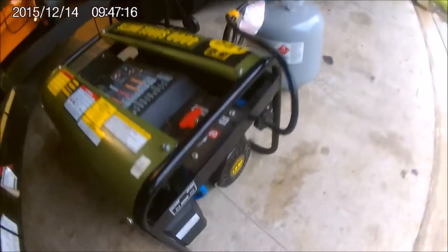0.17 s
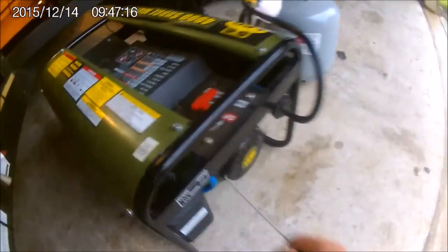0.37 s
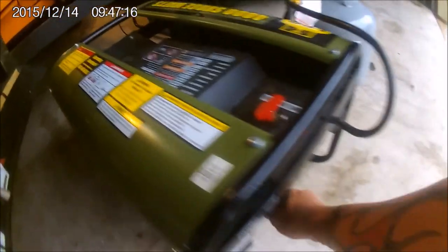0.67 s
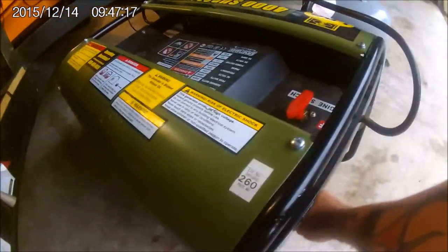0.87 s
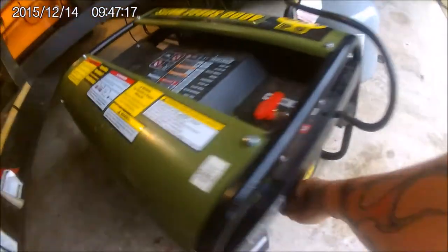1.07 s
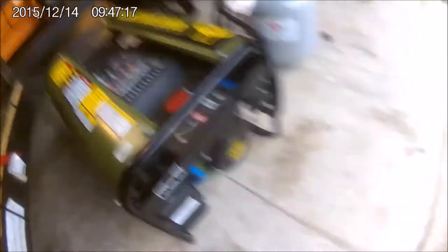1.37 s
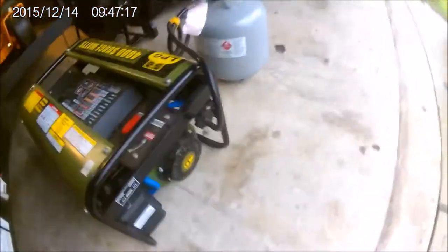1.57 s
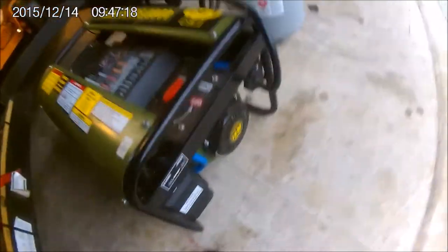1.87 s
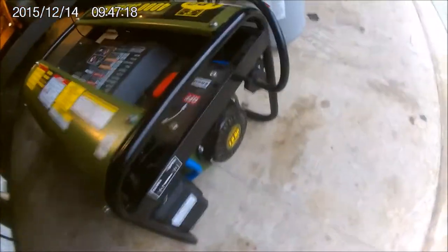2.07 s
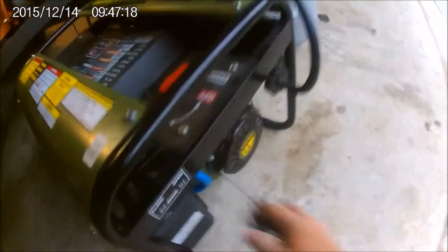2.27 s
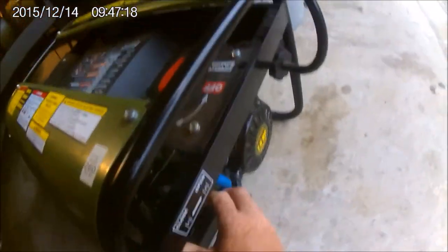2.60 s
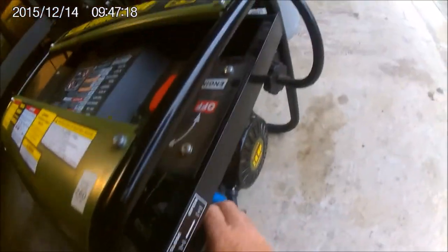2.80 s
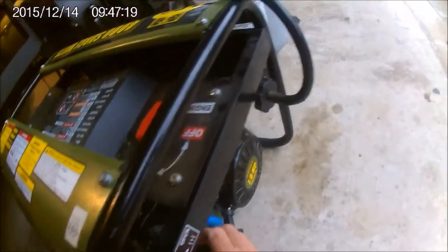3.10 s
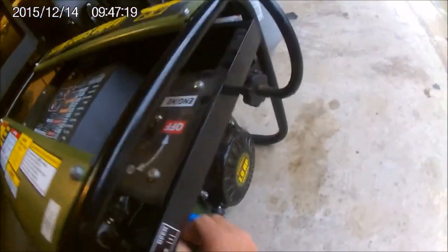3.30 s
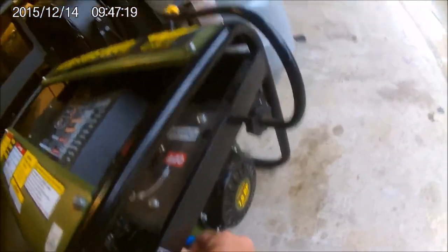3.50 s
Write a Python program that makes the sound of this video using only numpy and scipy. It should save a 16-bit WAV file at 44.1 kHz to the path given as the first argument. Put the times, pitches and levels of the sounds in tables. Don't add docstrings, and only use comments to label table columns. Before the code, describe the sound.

Small one-cylinder generator on outdoor concrete: the rope ticks back quietly, a pull makes pawls clack and metal clatter, then it catches, speeds up and drones loudly, heard through a muffled, ringing camera case.

```python
import sys
import numpy as np
from scipy import signal
from scipy.fft import rfft, irfft
from scipy.io import wavfile
from scipy.ndimage import uniform_filter1d, minimum_filter1d

SR = 44100
rng = np.random.default_rng(int(sys.argv[2]) if len(sys.argv) > 2 else 0)


def int16_out(signal):
    q = np.round(np.clip(np.atleast_2d(signal).T, -1, 1) * 32767)
    wavfile.write(sys.argv[1], SR, q.astype(np.int16))


def gain_from_db(level_db):
    decades = np.asarray(level_db, float) / 20
    return 10 ** decades


N = 160965
T = np.arange(N) / SR

# t/s, clatter level/dB, exhaust level/dB, once-a-cycle throb depth (0-1)
CRANKING = [
    (1.042, -31, -87, 0.3),
    (1.121, -35.5, -54.5, 0),
    (1.22, -26, -63.5, 0.6),
    (1.361, -26.5, -45, 0),
    (1.531, -26.5, -60.5, 0.3),
    (1.699, -24, -37, 0.1),
    (1.851, -20.5, -32.5, 0.3),
]
RUNNING = [(1.93, -22.5, -27.5, 0.16), (1.996, -15, -32.5, 0.19), (2.058, -14.5, -24, 0.12),
           (2.178, -12.5, -28, 0.58), (2.264, -13, -22, 0.097), (2.5, -11, -23, 0.12),
           (2.66, -11, -25.5, 0.037), (2.94, -12, -28, 0.023), (3.1, -12.5, -28.5, 0.052),
           (3.22, -11, -27, 0.43), (3.65, -12, -26.5, 0.08)]
# t/s, firing rate f/Hz
ENGINE_SPEED = [(1.04, 3), (1.12, 6), (1.22, 11), (1.36, 15), (1.53, 15.5), (1.9, 15.8), (1.962, 17.4),
                (2.148, 22.5), (2.294, 26.8), (2.352, 28), (2.504, 30.7), (2.616, 31.3), (2.776, 31.3),
                (3.068, 30.1), (3.166, 30), (3.254, 30.2), (3.65, 30.4)]
# place in the cycle (0-1), level/dB
VALVE_HITS = [(.05, -17.5), (.4, 2), (.62, 0), (.85, 9.5)]
# f/Hz, level/dB
MUFFLER_TONE = [(25, -32), (60, -12), (100, -11), (160, -2), (260, -4), (350, -6), (480, -4), (620, -25)]
STRONG_MULTIPLES = {2: 11, 5: 4, 6: 6, 7: 3, 9: 4, 12: 4, 15: 2}
# f/Hz, level/dB, time to fall 60 dB t/s
MUFFLER_CHAMBERS = [(131, -12, .12), (185.4, -22.5, .1), (283.5, 6.5, 0.36), (355, 16.5, 0.17)]
# f/Hz, level per Hz/dB
CASING_TONE = [(240, -53.5), (400, -24), (689, -14.5), (1310, -0.12), (1610, -3.5), (2000, -6.5),
               (2900, -9.5), (3700, -26.5), (4740, -34)]
# f/Hz, level per Hz/dB
CASING_TOP = [(5500, -53), (6200, -80), (11900, -120)]
# f/Hz, level per Hz/dB
FIZZ_TONE = [(5500, -14), (6500, 1), (7500, -1), (10000, 0), (12500, -4), (15600, -16), (16000, -40)]
# f/Hz, level/dB, time to fall 60 dB t/s
PANEL_RINGS = [(678, 1, 0.16), (862.7, -3.5, 0.72), (1043, 7, 0.16), (1280, 6.5, 0.092), (1282, 13, 0.071),
               (1405, 17, 0.093), (1746, 4.5, 0.1), (2073, 1, 0.27), (2527, 2, 0.15), (2836, -13, 0.13),
               (3100, -2, 0.088)]
# t/s, f/Hz
CASE_PITCH = [(1.1, 1404), (1.4, 1297), (1.45, 1313), (1.66, 1373), (2.46, 1478), (3.3, 1290), (3.42, 1360),
              (3.51, 1280), (3.65, 1490)]
# t/s, peak level/dB
FRAME_KNOCKS = [(0.793, -51), (0.932, -34), (0.956, -18.5), (0.987, -24.5), (1.001, -17.5), (1.011, -31),
                (1.024, -28), (1.046, -23.5), (1.403, -11), (1.414, -7.5), (1.439, -9.5), (1.487, -19),
                (1.558, -15), (1.593, -26), (1.711, -12.5), (1.814, -16), (1.919, -6), (1.932, -2.5),
                (2.022, -5), (2.049, -7.5), (2.089, -2), (2.102, -4.5), (2.186, 1), (2.195, -13)]
# t/s, level/dB
PAWL_SCRAPE = [(.88, -64), (.93, -46), (.975, -40), (.988, -22), (1.004, -21), (1.015, -16), (1.03, -18),
               (1.056, -31), (1.12, -42)]
# f/Hz, level/dB, time to fall 60 dB t/s
CUP_RINGS = [(2640, 0, .06), (2760, -1, .05), (1820, -5, .1), (2070, -7, .15), (4760, -25, .42),
             (4690, -33, .15), (4850, -34, .2), (7200, -42, .15), (9100, -32, .05), (12500, -22, .04)]
# t/s, f/Hz, level/dB
REEL_WHINE = [(1.08, 620, -50), (1.11, 680, -41), (1.14, 900, -38), (1.165, 1330, -30), (1.2, 1520, -34),
              (1.24, 1830, -30), (1.275, 2060, -35), (1.36, 2090, -39), (1.46, 2080, -46)]
# f/Hz, level/dB, time to fall 60 dB t/s
WHINE_RINGS = [(680, -3, .06), (870, -3, .06), (1290, 0, .06), (1400, 0, .06), (1850, 0, .07),
               (2080, -5, .08)]
# t/s, peak level/dB, f/Hz
TIN_TAPS = [(0.788, -33, 1344), (0.934, -33, 2860), (0.957, -27, 2880), (0.986, -23, 1270),
            (1.006, -14, 2830), (1.019, -12, 1380), (1.166, -13.5, 1397), (1.206, -13, 1236),
            (1.237, -9, 1283), (1.263, -8.5, 1202), (1.296, -9, 1305), (1.34, -8.5, 1243),
            (1.375, -8.5, 1290), (1.444, -18, 1340), (1.486, -15.5, 2050), (1.554, -26.5, 1380),
            (1.591, -9, 2050), (1.626, -11.5, 1320), (1.658, -18, 1320), (1.71, -9, 1297),
            (1.735, -11, 1287), (1.809, -6, 2030), (1.841, -14, 1373), (1.894, -13, 1296),
            (1.917, -10, 1350), (2.021, -9.5, 1375), (2.087, 1, 1474), (2.181, 5, 1270)]
# t/s, peak level/dB, f/Hz
FRAME_TAPS = [(0.524, -30.5, 271), (0.788, -39, 655), (0.984, -33, 775), (1.013, -21, 798),
              (1.308, -23, 885), (1.359, -28, 860), (1.519, -19.5, 660), (1.653, -14.5, 891),
              (1.759, -19, 641), (1.789, -16, 633), (1.924, -25, 880), (2.019, -10.5, 900),
              (2.049, -12.5, 912), (2.093, -4, 767)]
# t/s, level/dB
ROPE_REWIND = [
    (0.0, -42),
    (0.218, -46),
    (0.322, -59),
    (0.394, -52.5),
    (0.4, -55),
    (0.5, -61),
]
# f/Hz, width f/Hz, level/dB
REEL_HOUSING = [(641, 11, -4), (900, 55, 4), (1436, 40, -4.5), (1580, 140, 7.5), (2180, 42, -24),
                (2730, 43, -8.5)]
# t/s, length t/s, level/dB, top f/Hz
CASE_THUMPS = [(0.05, 0.027, -48.5, 200), (0.1, 0.033, -54.5, 120), (0.458, 0.034, -48, 90),
               (0.557, 0.056, -51, 90), (0.513, 0.058, -46, 330), (0.615, 0.085, -61, 150),
               (0.694, 0.04, -61, 200), (0.82, 0.052, -56, 120), (0.864, 0.023, -46.5, 394),
               (1.166, 0.014, -37.5, 433), (1.246, 0.047, -65, 200)]
# f/Hz, level per Hz/dB
YARD_TONE = [(15, -31), (25, -4.5), (101, -15), (135, -14.5), (570, -15), (1170, -1), (1680, -10),
             (3290, -16), (5400, -52.5), (7020, -75), (11900, -120)]
# t/s, length t/s, top f/Hz
TREBLE_GAPS = [
    (1.908, .022, 3700),
    (2.291, .022, 4000),
]


def engine():
    s, clatter_db, exhaust_db, throb = np.array(list(CRANKING) + list(RUNNING)).T
    hz = np.interp(T, *np.array(ENGINE_SPEED).T, left=0)
    phase = 0.6 + np.cumsum(hz) / SR
    size = rng.standard_normal((200, 6))[phase.astype(int)]
    hits = 0
    for k, (place, db) in enumerate(VALVE_HITS):
        hits = hits + gain_from_db(db + 2.5 * size[:, k]) * np.exp(-((phase - place) % 1) / 0.25)
    share = np.clip(np.interp(T, s, throb), 0, 1)
    throbbing = 1 - share + share * level(hits, 0)
    clatter = metal(grains(1.0) * throbbing * gain_from_db(0.22 * walk(30.25)))
    clatter = level(clatter, 0) * gain_from_db(np.interp(T, s, clatter_db))
    beats = exhaust(phase, hz) * gain_from_db(np.interp(T, s, exhaust_db) - 8.5)
    turning = np.clip((T - s[0]) / 0.018 + 1, 0, 1)
    return turning * (clatter + beats)


def exhaust(phase, hz):
    catch_s, governed_hz, puff_hz, puff_db = 1.915, 30, 300, -10.5
    tube_hz, tube_db = np.array(MUFFLER_TONE).T
    wander = 0.14 * (governed_hz / np.maximum(hz, 10)) ** 1.5
    beats = 0
    for k in range(1, 30):
        tube = np.interp(k * hz, tube_hz, tube_db, -60, -60)
        gain = gain_from_db(tube + STRONG_MULTIPLES.get(k, 0) + walk(12))
        angle = 2 * np.pi * k * phase + 0.012 * k * k + 2.1
        beats = beats + gain * np.cos(angle + wander * walk(8))
    beats = level(beats, -3) + level(ring(beats, MUFFLER_CHAMBERS), 0)
    firing = np.clip((T - catch_s) / 0.02, 0.1, 1)
    puff = bandpass(grains(1.0), puff_hz / 2.5, puff_hz * 1.6, 3)
    return level(beats, 0) * firing + level(puff * gain_from_db(2.0 * walk(25)), puff_db)


def metal(x, crack_db=0):
    throttle_s, length_s, throttle_db = 2.3, 0.45, 5
    throttle = gain_from_db(throttle_db * np.exp(-((T - throttle_s) / length_s) ** 2))
    fizz = level(colour(x * gain_from_db(2 * walk(97)), FIZZ_TONE), -52.5 + crack_db) * throttle
    casing = level(colour(x, list(CASING_TONE) + list(CASING_TOP)), 0)
    panels = level(highpass(ring(x, PANEL_RINGS), 500), -7)
    return casing + lowpass(case(x) + panels, 4800) + fizz


def case(x):
    t60_s = 0.048
    hz = np.interp(T, *np.array(CASE_PITCH).T) * (1 + 0.034 * walk(30))
    turn = np.exp(2j * np.pi * np.cumsum(hz) / SR)
    decay = np.exp(-np.log(1000) / (t60_s * SR))
    rung = signal.lfilter([1], [1, -decay], x / turn) * turn
    return level(rung.imag, -7.5)


def starter():
    release_s = 1.413
    kick = sum(gain_from_db(db) * swell(s, 0.011) for s, db in FRAME_KNOCKS)
    knocks = gain_from_db(-9) * kick * metal(grains(1.0), 5)
    scrape_gain = gain_from_db(np.interp(T, *np.array(PAWL_SCRAPE).T, -120, -120))
    scrape = metal(grains(1.5) * gain_from_db(4.0 * walk(70)), 9) * scrape_gain * gain_from_db(-8)
    let_go = swell(release_s, 0.006) + 0.3 * swell(release_s - 0.01, 0.01)
    cup = highpass(ring(let_go * grains(1.0), CUP_RINGS), 900)
    cup = lowpass(cup, 5200, 3)
    early_kick = 0.7 * kick * (T < 1.06)
    bite_rings = [(310, -24, 0.12), (2850, 0, 0.04), (2050, -4, 0.04), (4700, -24, 0.03)]  # Hz, dB, s
    bite = highpass(ring((scrape_gain + early_kick) * grains(1.5), bite_rings), 270)
    bite = gain_from_db(-12.5) * lowpass(bite, 5100) / np.max(np.abs(bite))
    cup = gain_from_db(-6) * cup / np.max(np.abs(cup))
    return lowpass(taps(), 4500) + knocks + scrape + whine() + cup + bite


def whine():
    s, hz, db = np.array(REEL_WHINE).T
    turn = 2 * np.pi * np.cumsum(np.interp(T, s, hz) * (1 + 0.06 * walk(400))) / SR
    teeth = np.sin(turn) * gain_from_db(np.interp(T, s, db, -120, -120) + 4 * walk(120))
    return gain_from_db(-32.5) * ring(teeth, WHINE_RINGS) + teeth


def taps():
    t60_s, rise_s, tap_db = 0.11, 0.00097, -7.5
    out = np.zeros(N)
    t = T[:SR // 8]
    for s, db, hz in list(TIN_TAPS) + list(FRAME_TAPS):
        at = int(s * SR)
        fade = gain_from_db(db + tap_db - 60 * t / t60_s) * np.minimum(t / rise_s, 1)
        out[at:at + len(t)] += fade * np.sin(2 * np.pi * hz * t)
    return out


def rewind():
    tick_turn = 2 * np.pi * np.cumsum(45 * (1 + 0.2 * walk(11))) / SR
    ticks = grains(1.8) * (1 + 0.4 * np.cos(tick_turn))
    modes = ring(ticks, [(hz, db + 10 * np.log10(width), 3.5 / width) for hz, width, db in REEL_HOUSING])
    casing = level(colour(ticks, list(CASING_TONE) + list(CASING_TOP)), -1.6)
    housing = level(bandpass(modes, 450, 3200, 4), 0) + casing
    return level(housing, 0) * gain_from_db(np.interp(T, *np.array(ROPE_REWIND).T, right=-120) + 1.5)


def handling():
    out = 0
    for s, length, db, hz in CASE_THUMPS:
        rumble = lowpass(rng.standard_normal(N), hz, 2)
        out = out + level(rumble, db) * np.exp(-((T - s) / length) ** 2 * 2)
    return out


def yard():
    hush = level(colour(rng.standard_normal(N), YARD_TONE), -54) * gain_from_db(1.5 * walk(6))
    return hush + gain_from_db(-88) * rng.standard_normal(N)


def level(x, db):
    return x * gain_from_db(db) / np.sqrt(np.mean(x ** 2))


def colour(x, points):
    hz, db = np.array(points).T
    grid_hz = np.linspace(1, SR / 2, 2049)
    log_gain = np.interp(np.log(grid_hz), np.log(hz), db, db[0] - 25, -90) / 20 * np.log(10)
    cepstrum = irfft(log_gain)
    cepstrum[1:2048] *= 2
    cepstrum[2049:] = 0
    return signal.fftconvolve(x, irfft(np.exp(rfft(cepstrum))))[:N]


def ring(x, modes):
    out = 0
    for hz, db, t60 in modes:
        pole = np.exp(2j * np.pi * hz / SR - np.log(1000) / (t60 * SR))
        out = out + gain_from_db(db) * signal.lfilter([1], [1, -pole], x).imag
    return out


def swell(s, decay):
    return np.exp(-np.where(T < s, (s - T) / 0.0024, (T - s) / decay))


def walk(rate):
    k = int(SR / rate)
    steps = np.repeat(rng.standard_normal(N // k + 1), k)
    return 1.84 * uniform_filter1d(uniform_filter1d(steps, k), k)[:N]


def grains(spread_db):
    return level(rng.standard_normal(N) * gain_from_db(spread_db * rng.exponential(size=N)), 0)


def highpass(x, hz):
    return signal.sosfilt(signal.butter(4, hz, "high", fs=SR, output="sos"), x)


def lowpass(x, hz, order=8):
    return signal.sosfilt(signal.butter(order, hz, fs=SR, output="sos"), x)


def bandpass(x, low_hz, high_hz, order):
    return signal.sosfilt(signal.butter(order, [low_hz, high_hz], "band", fs=SR, output="sos"), x)


def scene():
    return (engine() + starter() + rewind() + handling() + yard())[None]


def top_cut(x):
    return signal.sosfilt(signal.butter(12, 15700, fs=SR, output="sos"), x)


def record(dry):
    x = dry
    for hz, q in [(6050, 6), (6050, 10), (8150, 12)]:
        x = signal.lfilter(*signal.iirnotch(hz, q, SR), x)
    for s, length, hz in TREBLE_GAPS:
        gap = np.clip((length / 2 - np.abs(T - s)) / 0.004 + 0.5, 0, 1)
        dull = signal.sosfiltfilt(signal.butter(8, hz, fs=SR, output="sos"), x)
        x = x * (1 - gap) + gap * gain_from_db(0.5) * dull
    x = x + gain_from_db(-9) * (np.arange(N) == N - 3)
    ceiling = 0.88
    over = -minimum_filter1d(-np.maximum(np.abs(x) / ceiling, 1), size=176)
    x = x / uniform_filter1d(uniform_filter1d(over, size=88), size=88)
    return top_cut(x)


dry = scene()
out = record(dry)
int16_out(out)
```